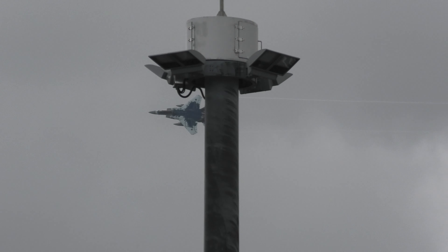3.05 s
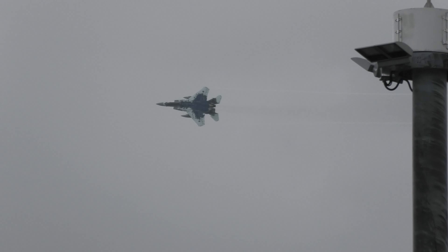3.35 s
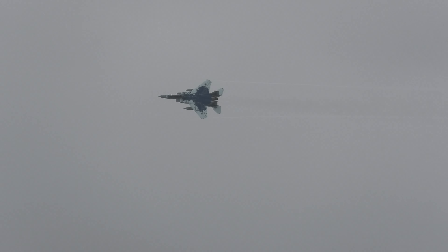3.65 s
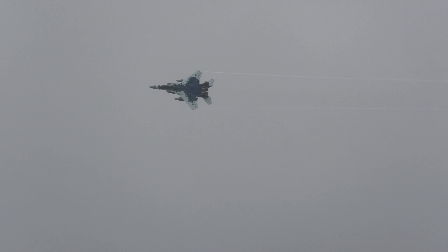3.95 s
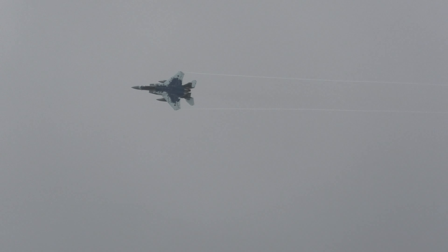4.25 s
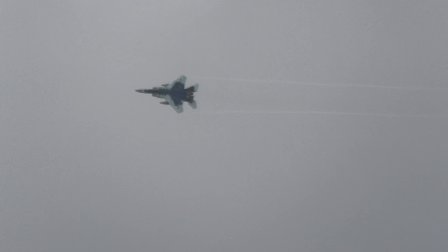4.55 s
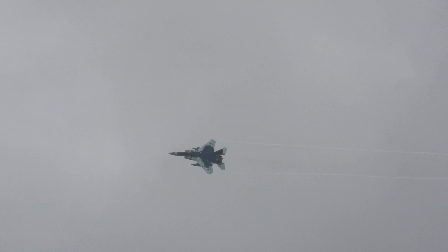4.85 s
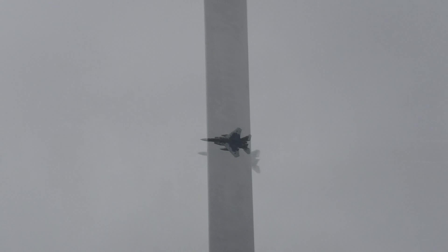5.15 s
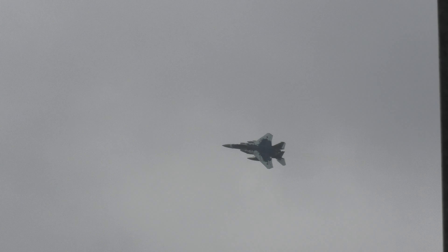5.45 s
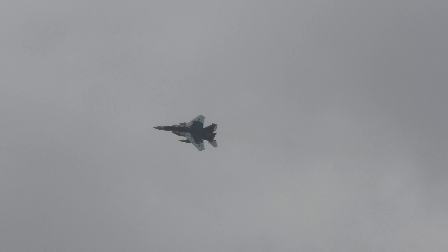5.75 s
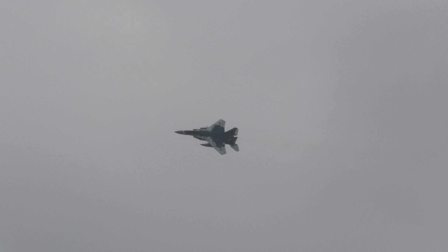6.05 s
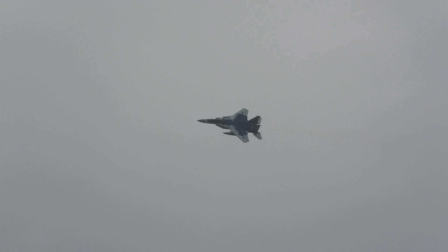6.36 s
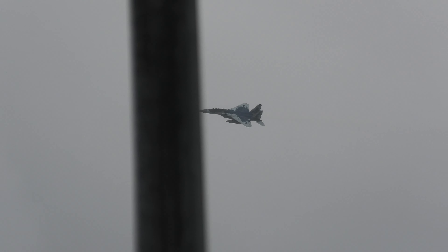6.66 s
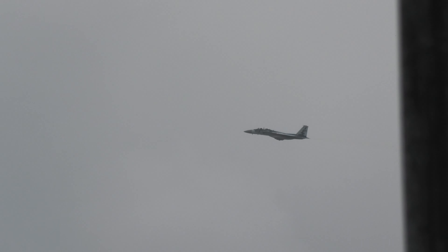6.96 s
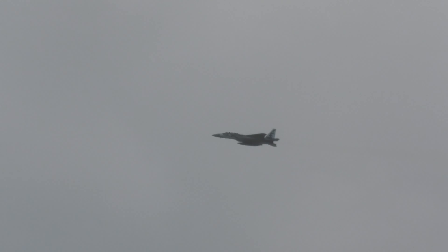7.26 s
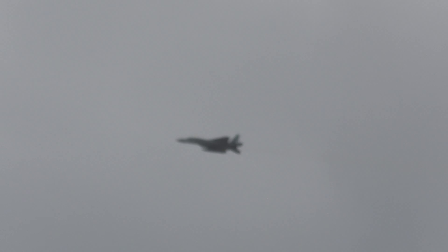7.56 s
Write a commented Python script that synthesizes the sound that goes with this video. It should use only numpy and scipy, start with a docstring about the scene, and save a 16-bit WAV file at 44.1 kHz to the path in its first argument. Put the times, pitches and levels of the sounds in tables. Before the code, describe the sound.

A fighter jet roars through a low turn overhead while gusty wind rumbles, thumps and crackles on the microphone.

```python
"""A windy airfield: a twin-engine fighter flies a tight turn low overhead.
Its exhaust roar flutters and howls in the turbulent air, dulls in mid-turn, then swells to the right.
Wind buffets the two microphone ports: eddies rumble and thump, pressure steps crackle and ring
the port cavity. The hardest gusts make the limiter duck the roar."""
import sys
import numpy as np
from scipy import signal
from scipy.fft import rfft, irfft, next_fast_len
from scipy.io import wavfile
from scipy.ndimage import uniform_filter1d, minimum_filter1d

SR = 44100
rng = np.random.default_rng(int(sys.argv[2]) if len(sys.argv) > 2 else 0)


def output_pcm(signal):
    """Save a mono or channel-first signal as 16-bit PCM at the path in sys.argv[1].

    Samples are clipped to [-1, 1] before scaling.
    """
    pcm = np.clip(np.atleast_2d(signal).T, -1, 1) * 32767
    wavfile.write(sys.argv[1], SR, np.round(pcm).astype(np.int16))


N = 334715
TIME = np.arange(N) / SR
FFT_SIZE = next_fast_len(N)
HZ = np.maximum(np.arange(FFT_SIZE // 2 + 1) * SR / FFT_SIZE, 1)
CAVITY_HZ, CAVITY_RING_S = 4150, .002

# Direction of the jet, before weighting by band. Each row: time in seconds, left over right in dB,
# phase between the ports in rad, left-right coherence from 0 to 1.
BEARING = [(0, -2, 1.9, 0.53), (.4, -3.5, 1.6, 0.28), (.7, 0, 0.76, 0.6), (1.8, 2, 0.56, 0.74),
           (3, -0.5, 0.78, 0.55), (3.7, -1.5, 0.48, 0.38), (4.4, -2, 0.91, 0.27), (5.1, -3.5, 0.65, 0.35),
           (5.8, -8.5, 1.38, 0.88), (6.5, -8, 1.28, 0.89), (7.1, -7.5, 1.3, 0.77), (7.59, -9.5, 1.32, 1)]


def from_db(db):
    """Decibels to gain."""
    return np.exp(np.asarray(db) * (np.log(10) / 20))


def unit_rms(x):
    """Scale to unit power."""
    return x / np.sqrt(np.mean(x ** 2) + 1e-20)


def in_time(rows):
    """One curve per column, sample by sample."""
    times_s, *columns = np.transpose(rows)
    return [np.interp(TIME, times_s, c) for c in columns]


def at_hz(rows, hz):
    """Each column read on a log-frequency axis."""
    points_hz, *columns = np.transpose(rows)
    return [np.interp(np.log(hz), np.log(points_hz), c) for c in columns]


def colour(x, gain):
    """Filter by a gain per frequency."""
    return irfft(rfft(x, FFT_SIZE) * gain, FFT_SIZE)[..., :N]


def band_pass(x, low_hz, high_hz, order=2):
    """Butterworth band-pass."""
    sos = signal.butter(order, [low_hz, high_hz], "band", fs=SR, output="sos")
    return signal.sosfilt(sos, x + 1e-18)


def white():
    """Spectrum of white noise."""
    return rfft(rng.standard_normal(FFT_SIZE))


def drift(rate_hz):
    """Smooth random curve of unit RMS."""
    step, settle = 20, 4000
    pole = np.exp(-2 * np.pi * rate_hz * step / SR)
    noise = rng.standard_normal(N // step + settle + 2)
    slow = signal.lfilter([1], [1, -2 * pole, pole * pole], noise)[settle:]
    return np.interp(np.arange(N) / step, np.arange(len(slow)), unit_rms(slow))


def pan(left_db):
    """Left and right gains of constant power."""
    gains = from_db(np.array([left_db, -left_db]).reshape(2, -1) / 2)
    return gains / np.sqrt(np.mean(gains ** 2, axis=0))


def steady(x, window_s):
    """Hold the running power at 1."""
    width = int(window_s * SR)
    power = uniform_filter1d(uniform_filter1d(np.mean(x ** 2, axis=0), width), width)
    return x / np.sqrt(np.abs(power) + 1e-20)


def exhaust(flutter_db=1.0, band_flutter_db=2.0, flutter_hz=9, rough_db=0.79, rough_hz=70):
    """Jet mixing noise; eddies on the way make it flutter as a whole and band by band."""
    # Mixing noise spectrum. Each row: frequency in Hz, relative density in dB.
    spectrum = [(100, -2), (190, -5), (290, 2), (400, 0), (560, -5), (820, -9), (1100, -13), (1500, -19),
                (2000, -26), (2600, -33.5), (3300, -47), (3900, -54), (4500, -63), (8000, -74.5)]
    # Directivity of the ports. Each row: frequency in Hz, weights on BEARING's level, phase, coherence.
    ports = [(150, 0.035, -1, 0.48), (256, 1.04, -0.32, 1.265), (404, 1.25, -0.79, 1.06),
             (700, 0.57, 0.72, 0.9), (1230, 0.97, 1.48, 1.2), (2160, 0.025, 0.92, 0.75),
             (3500, -0.24, -0.92, 0.51)]
    # Roar through the turn. Each row: time in seconds, relative level in dB, rumble over roar in dB.
    turn = [(0, -19, 2), (0.15, -18.5, -1), (0.36, -21.5, 4.5), (.46, -19.5, 3.5), (.56, -21.5, 4.5),
            (.7, -20, 3.5), (0.88, -22, 5), (1.07, -18.5, 3), (1.115, -19, 4.5), (1.2, -24.5, 7),
            (1.5, -21.5, 7.5), (1.8, -24.5, 9), (2.1, -21, 5), (2.35, -21.5, 4.5), (2.7, -20.3, 4.5),
            (3.04, -20, 5.5), (3.2, -25.5, 9), (3.34, -23.5, 6), (3.65, -25.5, 3), (3.92, -25, 5),
            (4.1, -22, 6), (4.21, -22, 2.5), (4.31, -23, 7), (4.7, -28.5, 6.5), (4.92, -25.5, 5),
            (5.03, -28.5, 6), (5.075, -34.5, 10), (5.15, -34.5, 10.5), (5.24, -30, 8.5), (5.35, -26, 6.5),
            (5.72, -27, 9), (5.92, -21.5, 1.5), (6.05, -22, 2), (6.25, -18.5, 1), (6.55, -18.5, 0),
            (6.78, -15.5, 0), (7.08, -16, -1.5), (7.2, -18, -1.5), (7.59, -16.5, -1)]
    left_db, phase_rad, coherence = in_time(BEARING)
    shape = from_db(at_hz(spectrum, HZ)[0])
    direct, scattered = white() * shape, white() * shape
    spectra = np.array([direct, 1j * direct, scattered])
    centres_hz = 110 * 2 ** (np.arange(12) / 2)
    band_index = np.interp(np.log(HZ), np.log(centres_hz), np.arange(len(centres_hz)))
    low_cut = np.minimum(HZ / centres_hz[0], 1) ** 2
    registers = np.zeros((3, 2, N))   # rumble, roar, rasp
    opening_edge_db = 4.5 * np.exp(-(TIME / .45) ** 2)   # brief tearing edge on the rasp
    for k, hz in enumerate(centres_hz):
        band = np.sqrt(np.maximum(1 - np.abs(band_index - k), 0)) * low_cut
        right, quadrature, diffuse = irfft(spectra * band, FFT_SIZE)[:, :N]
        level_weight, phase_weight, coherence_weight = at_hz(ports, hz)
        alike = np.clip(coherence * coherence_weight, 0, 1)
        angle = phase_rad * phase_weight
        shifted = quadrature * np.sin(angle) - right * np.cos(angle)   # antiphase at zero angle
        left = alike * shifted + np.sqrt(1 - alike ** 2) * diffuse
        edge_db = opening_edge_db * np.exp(-(np.log2(hz / 3340) / .4) ** 2)
        gain = pan(left_db * level_weight) * from_db(band_flutter_db * drift(flutter_hz) + edge_db)
        registers[np.searchsorted([560, 1500], hz)] += np.array([left, right]) * gain
    level_db, depth_db = in_time(turn)
    swing_db = level_db - level_db.mean()
    roar_db = -25 + swing_db
    rasp_db = -38.5 + 0.68 * swing_db + 2 * np.exp(-(TIME / 0.9) ** 2)   # extra rasp at first
    levels_db = roar_db + depth_db, roar_db, rasp_db
    roar = sum(steady(part, 0.062) * from_db(db) for part, db in zip(registers, levels_db))
    return roar * from_db(flutter_db * drift(flutter_hz) + rough_db * drift(rough_hz))


def buffeting(opposed=0.33, split_hz=55):
    """Big eddies press on one port while they suck at the other; small ones flutter on each alone."""
    # Wind on the ports. Each row: time in seconds, relative levels in dB of big and of small eddies.
    wind = [(0, -22, -20), (0.33, -6, -16), (0.7, -12, -25), (0.87, -6, -21), (1.02, -10, -23),
            (1.3, -8.5, -28), (1.55, -4.5, -20), (1.85, -4.5, -17), (2.07, -11, -15), (2.45, -12.5, -22),
            (2.92, -6.5, -16), (3.3, -9.5, -19), (3.65, -8, -20), (4.1, -9.5, -21), (4.5, -6, -13.5),
            (5.08, -4.5, -13.5), (5.4, -8, -20), (5.9, -7, -24), (6.05, -9, -29), (6.25, -14.5, -34),
            (6.55, -11, -23), (7.1, -16.5, -29), (7.27, -12, -26), (7.59, -16, -32)]
    # Eddy spectrum. Each row: frequency in Hz, relative density in dB.
    spectrum = [(4, 10.5), (13, -5.5), (22, -3), (32, 0.5), (48, -12), (70, -15), (100, -19), (150, -27.5),
                (250, -41), (600, -69)]
    big_db, small_db = in_time(wind)
    shape = from_db(at_hz(spectrum, HZ)[0]) / (1 + (HZ / 700) ** 4) / (1 + (4 / HZ) ** 4)
    big_share = 1 / (1 + (HZ / split_hz) ** 6)
    left, other = irfft(np.array([white(), white()]) * shape * np.sqrt(big_share), FFT_SIZE)[:, :N]
    small = irfft(np.array([white(), white()]) * shape * np.sqrt(1 - big_share), FFT_SIZE)[:, :N]
    right = np.sqrt(1 - opposed ** 2) * other - opposed * left
    big = steady(np.array([left, right]), 0.043)
    small = steady(small * np.sqrt(1.6 + big ** 2), 0.19)   # strongest at the big eddies' crests
    pressure = big * from_db(big_db - 0.5) * pan(5.3) + small * from_db(small_db - 1) * pan(3.0)
    return np.tanh(pressure)


def crackle(level_db, snaps_per_s=220, spread_db=4.0, snap_s=0.00023, clump_db=1.4, clump_hz=45):
    """Wind fizz of tiny uneven snaps, swelling in clumps; the top sizzle comes and goes."""
    # Fizz spectrum. Each row: frequency in Hz, relative density in dB.
    spectrum = [(2200, -6), (2750, 2.5), (3200, 4), (4100, 2), (5500, -2.7), (7000, -6.7), (8500, -9),
                (11000, -21), (15500, -28)]
    # Sizzle above 7.5 kHz. Each row: time in seconds, treble gain in dB.
    sizzle = [(0, -15), (.75, -2), (1.2, -2), (2.2, -2.5), (2.45, 1), (3.05, 3), (3.25, -2), (3.42, 3),
              (3.6, -2), (3.73, 7), (4, 1.5), (4.2, 5), (4.67, -2), (4.88, 4), (5.12, -4), (5.38, 0),
              (5.5, 8), (5.68, -5), (5.95, 3), (6.28, -1), (6.45, 8), (6.62, 1), (6.88, 7), (7.08, 5),
              (7.15, -2), (7.25, 4), (7.4, -1), (7.59, 3)]
    onsets = rng.random(N) < snaps_per_s / SR
    sizes = onsets * from_db(spread_db * np.minimum(rng.exponential(1, N), 3))
    snaps = np.sqrt(signal.lfilter([1], [1, -np.exp(-1 / (snap_s * SR))], sizes ** 2 + 1e-18))
    fizz = rng.standard_normal((2, N)) * np.sqrt(1 + (from_db(-3.5) * unit_rms(snaps)) ** 2)
    fizz = fizz - 0.058 * fizz[::-1]   # ports slightly opposed
    fizz *= from_db(clump_db * drift(clump_hz))
    shape = from_db(at_hz(spectrum, HZ)[0])
    top = 1 / (1 + (7500 / HZ) ** 6)
    top_gain = from_db(in_time(sizzle)[0] + 2.2 * drift(rate_hz=12))
    fizz = colour(fizz, shape * (1 - top)) + colour(fizz, shape * top) * top_gain
    return unit_rms(fizz) * pan(3.5) * from_db(level_db)


def ticks(level_db, each_per_s=11):
    """Lone snaps stand out of the fizz: some dry and bright, some ringing in the port cavity."""
    onsets = rng.random((2, N)) < each_per_s / SR
    bright, ringing = onsets * (2 * rng.random((2, N)) - 1) * from_db(level_db) + 1e-18
    bright = band_pass(bright, 4800, 14000, order=1)
    pole, step_rad = np.exp(-1 / (CAVITY_RING_S * SR)), 2 * np.pi * CAVITY_HZ / SR
    ringing = signal.lfilter([0, np.sin(step_rad)], [1, -2 * pole * np.cos(step_rad), pole ** 2], ringing)
    return (from_db(30) * bright + from_db(12) * ringing) * pan(3.6) * [[1], [-1]]


def howls(relative_width=0.31, phase_weight=0.66, coherence=0.72):
    """The air focuses a narrow band of the roar, which waxes and wanes from the jet's direction."""
    # Each row: centre in seconds, pitch in Hz, relative level in dB, Gaussian half length in seconds.
    swells = [(.13, 1110, -21, 0.04), (.15, 286, -17, 0.065), (.385, 306, -10.5, 0.037),
              (.46, 1250, -22, .022), (.55, 440, -18, .05), (0.621, 310, -15.5, 0.067),
              (.95, 420, -16.5, .04), (0.995, 325, -10.5, 0.042), (1.173, 286, -17, 0.055),
              (1.609, 330, -16, 0.023), (2.13, 620, -20, .04), (2.18, 450, -18, 0.05),
              (2.62, 175, -20, .03), (2.7, 380, -21, .04), (3.338, 372, -18, 0.022), (3.8, 140, -22, .1),
              (3.84, 330, -16, 0.02), (4.099, 203, -18, .035), (4.11, 430, -19, .025),
              (4.22, 145, -20, .06), (4.3, 340, -17, 0.028), (4.8, 300, -21, .03), (5, 260, -24, .1),
              (5.648, 346, -17, 0.02), (5.8, 145, -23, .1), (6.223, 280, -15, 0.037),
              (6.27, 355, -15.5, 0.048), (6.74, 160, -21, .1), (6.76, 955, -18.5, 0.062),
              (6.83, 287, -18.5, 0.044), (6.9, 380, -17, .018), (6.975, 810, -11.5, 0.03),
              (7.085, 1020, -12.5, 0.026), (7.09, 660, -12, .026), (7.128, 760, -8, 0.025),
              (7.129, 375, -14.5, 0.037), (7.31, 760, -14.5, .025), (7.424, 286, -14, 0.038),
              (7.445, 440, -11.5, 0.027), (7.57, 590, -14, 0.032)]
    length = SR // 2
    age_s, hz = np.arange(length) / SR, np.arange(length) * SR / length
    left_db, phase_rad, _ = in_time(BEARING)
    out = np.zeros((2, N + SR))
    for centre_s, pitch_hz, db, half_s in swells:
        centre = int(centre_s * SR)
        start = max(centre - length // 2, 0)
        envelope = np.exp(-((age_s + start / SR - centre_s) / half_s) ** 2 / 2)
        resonance = 1 / (1 + ((hz / pitch_hz - 1) / (relative_width / 2)) ** 2)
        howl = envelope * np.fft.ifft(resonance * np.fft.fft(rng.standard_normal((2, length))))
        power = np.sum(howl.real ** 2, axis=1, keepdims=True) / np.sum(envelope ** 2)
        right, scattered = howl / np.sqrt(power)
        shifted = -right * np.exp(-1j * phase_rad[centre] * phase_weight)
        left = coherence * shifted + np.sqrt(1 - coherence ** 2) * scattered
        out[:, start:start + length] += np.real([left, right]) * pan(left_db[centre]) * from_db(db - 1)
    return out[:, :N]


def cracks(split_hz=6300, ring_fade_db_per_s=1.3):
    """Steep pressure steps spit, set the port cavity ringing and leave a duller rasp."""
    # Each row: start in seconds, relative level in dB, left over right in dB, treble trim in dB,
    # rasp decay in seconds.
    steps = [(0.387, -45, 5, 0, .003), (0.631, -42.5, 1, -2, .003), (0.7225, -40, 6, -2, .008),
             (0.816, -40, 3, -3, .007), (0.941, -42.5, 0, -1, .003), (0.997, -41, 4, 3, .002),
             (1.063, -42, 0, 0, .003), (1.0814, -40, 1.5, 1, .002), (1.2497, -44.5, 0, -2, .003),
             (1.3734, -43, 0, -2, .003), (1.495, -42.5, 2, -1, .003), (1.5884, -43, 1.5, -6, .003),
             (2.049, -38.5, 2, -1, .003), (2.3043, -39.5, 6, -3, .003), (2.436, -37, 3, -1, .003),
             (2.5585, -35, 4, 0, .003), (2.6805, -34.5, 7, 1, .002), (2.6943, -23.5, 11, -2, .015),
             (2.803, -33.5, 1, -2, .003), (2.9195, -38.5, 5, 10, .002), (3.025, -23, 7, -7, .018),
             (3.1333, -37.5, 4, 0, .002), (3.1444, -39, 2, 0, .004), (3.2318, -28.5, -6, -7, .003),
             (3.3945, -37, 0, 1, .003), (3.8018, -34.5, 5, 3, .003), (4.077, -37, 4.5, 3, .006),
             (4.199, -36, 6, 3, .003), (4.436, -36, 7, 6.5, .003), (5.0433, -38.5, -9, 2, .002),
             (5.4994, -39, 4, 3, .008), (5.8143, -40, 4, -4, .002), (5.931, -32, 8, -4, .004),
             (5.935, -32, 0, -4, .002), (5.9659, -40, 3, -1, .002), (6.086, -42, 2, 5, .003),
             (6.1388, -34.5, 4, -2, .003), (6.1795, -38, 3, -1, .003), (6.188, -31.5, 5, -5, .005),
             (6.204, -39, 3, -2, .003), (6.2184, -37, 2, -3, .004), (6.2275, -38, 3, 0, .003),
             (6.2538, -38, 2.5, -2, .004), (6.3259, -35.5, 3.5, -3, .003), (6.354, -38, 1.5, 3, .003),
             (6.8572, -39.5, 2.5, 4, .002), (6.934, -37.5, 2.5, 3, .002), (7.0918, -30.5, -7, -4, .004),
             (7.26, -39, 2, 0, .003)]
    age_s = TIME[:SR // 10]
    body, top, ring = np.zeros((3, 2, N))
    mean_db = np.mean(steps, axis=0)[1]
    for start_s, db, left_db, treble_db, rasp_s in steps:
        spit_s = 0.0017 + .00005 * (db - mean_db)   # louder cracks spit for longer
        spit, rasp, grain = rng.standard_normal((3, 2, len(age_s)))
        snap = from_db(-9) * spit * np.exp(-age_s / spit_s)
        snap[:, 0] += 1
        rasp = from_db(-17) * rasp * grain * np.exp(-age_s / rasp_s)
        ring_hz = CAVITY_HZ * (1 + .02 * rng.standard_normal())
        ring_db = mean_db + .55 * (db - mean_db) - ring_fade_db_per_s * start_s
        tone = np.sin(2 * np.pi * ring_hz * age_s) * np.exp(-age_s / CAVITY_RING_S)
        span = slice(int(start_s * SR), int(start_s * SR) + len(age_s))
        gain = from_db(db) * pan(left_db)
        body[:, span] += (snap + rasp) * gain
        top[:, span] += snap * gain * from_db(treble_db)
        ring[:, span] += tone * pan(left_db) * from_db(ring_db)
    body = np.array([band_pass(body[0], 3000, split_hz, order=3),
                     band_pass(body[1], 2000, split_hz, order=3)])   # the right port cracks lower
    return from_db(11.5) * body + from_db(10.5) * band_pass(top, split_hz, 9600) + from_db(-3.5) * ring


def with_thumps(rumble, width_cycles=0.53, right_lag_rad=1.0):
    """A small eddy bursts on the ports and replaces the rumble with one quick push and pull."""
    # Each row: centre in seconds, pressure in dB, pitch in Hz, left over right in dB.
    thumps = [(.899, -9.5, 70, 4), (1.024, -11, 75, 2), (2.02, -8, 60, 9), (2.175, -8, 69.6, 5),
              (2.907, -2, 48, 4), (3.297, -8, 65, 7), (3.62, -8, 57.6, 5.5), (4.397, -6.5, 55, 6),
              (4.527, -3, 60, 1), (4.627, -3.5, 55.4, 7), (4.742, -3.5, 72, 10), (4.931, -8, 70, 7),
              (5.004, -4.5, 56, 5), (5.134, -4, 45, 8), (5.776, -7.5, 70, 5), (6.42, -12, 45, 5),
              (6.62, -12, 50, 4), (7.27, -8.5, 45, 4)]
    out = rumble.copy()
    for centre_s, db, hz, left_db in thumps:
        near = np.abs(TIME - centre_s) < .06
        cycles = (TIME[near] - centre_s) * hz
        blend = np.exp(-(cycles / width_cycles) ** 2 / 2)
        push = np.sin([2 * np.pi * cycles, 2 * np.pi * cycles - right_lag_rad])
        out[:, near] += blend * (push * from_db(db) * pan(left_db) - out[:, near])
    return out


def with_gusts(rumble, width_s=.012):
    """A hard gust drives the rumble's current swing far out, in opposite senses at the two ports."""
    # Each row: centre in seconds, pressure in dB.
    gusts = [(1.092, 5.2), (1.87, -0.5), (2.207, 1.5), (3.085, 1.5), (3.182, 4.5), (4.553, 3), (4.7, 2.5),
             (5.055, 1.5), (5.165, 1.5), (5.733, 3)]
    blend, push = np.zeros((2, N))
    for centre_s, db in gusts:
        near = np.abs(TIME - centre_s) < .1
        pulse = np.exp(-((TIME[near] - centre_s) / width_s) ** 2)
        blend[near] += pulse
        push[near] += np.sign(rumble[0, int(centre_s * SR)]) * from_db(db) * pulse
    return rumble * (1 - blend) + push * pan(3.0) * [[1], [-1]]


def scene():
    """The jet overhead, the wind at the microphone."""
    # Strength of crackle and ticks. Each row: time in seconds, relative level in dB.
    grit_levels = [(0, -67.5), (0.25, -63.5), (0.75, -51.5), (1.05, -52.5), (1.2, -55.5), (1.5, -52),
                   (1.8, -55), (2.75, -47.5), (3.05, -49), (3.55, -53.5), (3.78, -49), (4.1, -47),
                   (4.42, -49), (4.65, -52.5), (4.9, -48.5), (5.13, -55), (5.5, -50.5), (5.72, -56),
                   (5.92, -54.5), (6.3, -55.5), (6.68, -51.5), (6.95, -52.5), (7.59, -56.5)]
    grit_db, = in_time(grit_levels)
    rumble = with_gusts(with_thumps(buffeting()))
    grit = crackle(grit_db + .5) + ticks(grit_db) + cracks()
    return exhaust() + howls() + rumble + grit


def record(dry, threshold=1.062, release_db_per_s=65, attack_s=0.005, stopband_hz=16400):
    """A limiter ducks both channels on every overload and recovers; a steep low-pass cuts the top."""
    over_db = 20 * np.log10(np.maximum(np.abs(dry).max(axis=0) / threshold, 1))
    held_db = np.maximum.accumulate(over_db + release_db_per_s * TIME) - release_db_per_s * TIME
    width = int(attack_s * SR)
    gain = uniform_filter1d(minimum_filter1d(from_db(-held_db), width), width) / threshold
    fade = np.clip(np.minimum(TIME, TIME[-1] - TIME) / .004, 0, 1)
    return signal.sosfilt(signal.cheby2(16, 60, stopband_hz, fs=SR, output="sos"), dry * gain * fade)


dry = scene()
out = record(dry)
output_pcm(out)
```